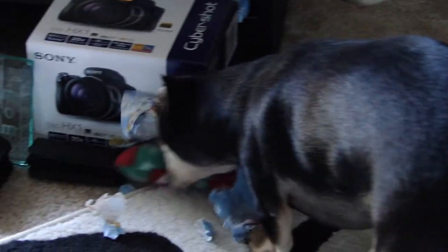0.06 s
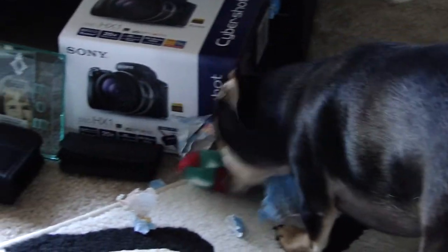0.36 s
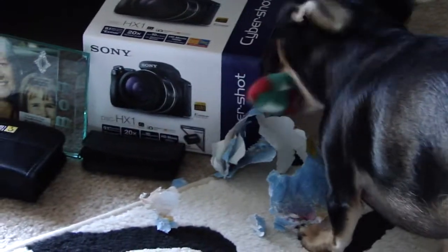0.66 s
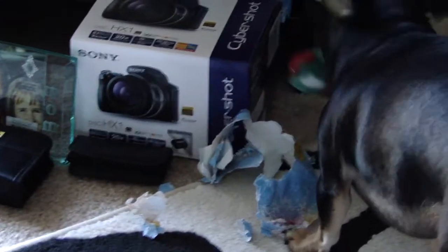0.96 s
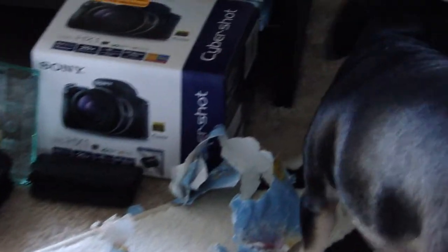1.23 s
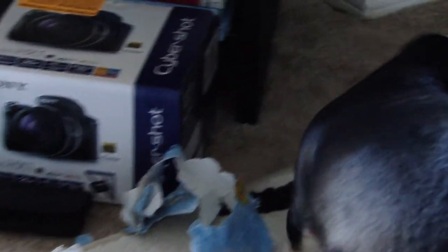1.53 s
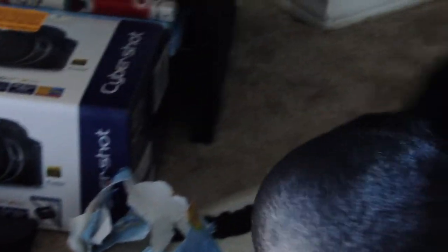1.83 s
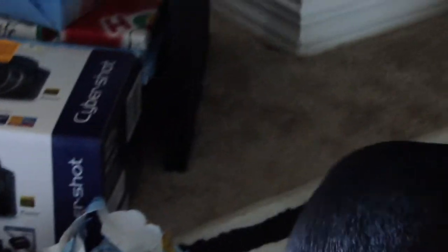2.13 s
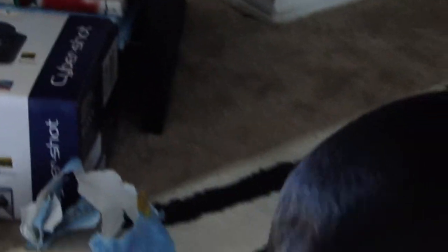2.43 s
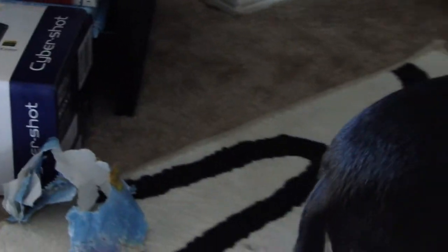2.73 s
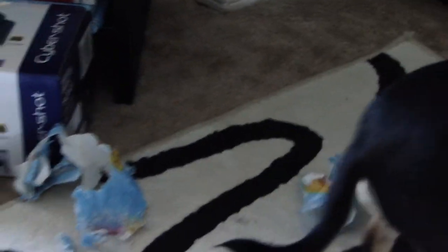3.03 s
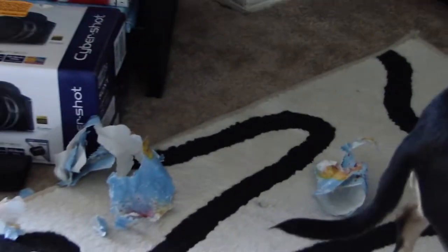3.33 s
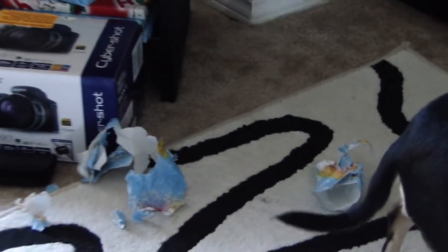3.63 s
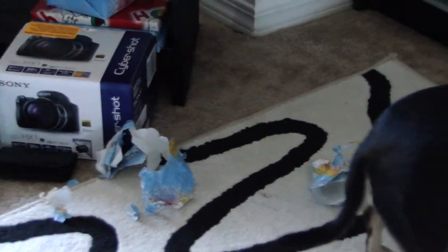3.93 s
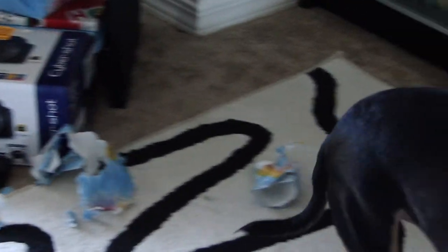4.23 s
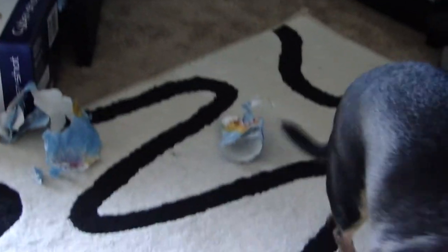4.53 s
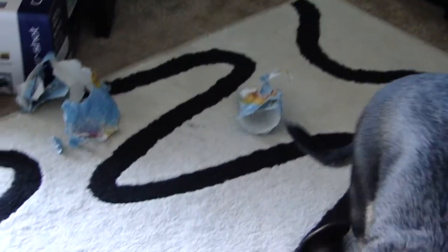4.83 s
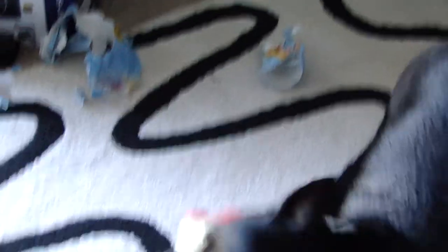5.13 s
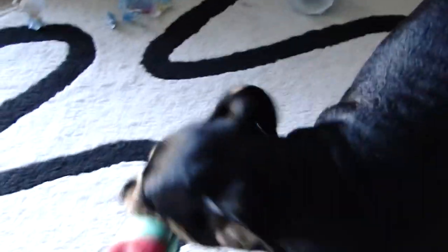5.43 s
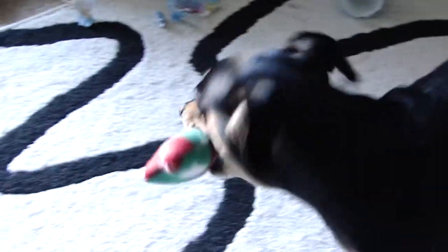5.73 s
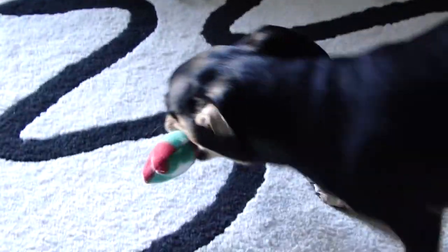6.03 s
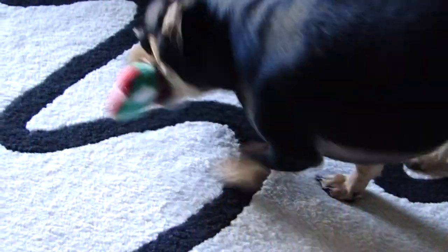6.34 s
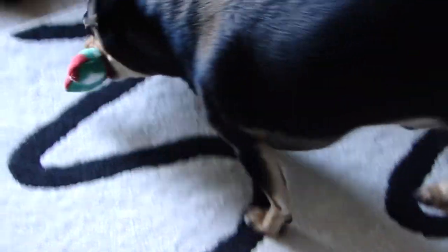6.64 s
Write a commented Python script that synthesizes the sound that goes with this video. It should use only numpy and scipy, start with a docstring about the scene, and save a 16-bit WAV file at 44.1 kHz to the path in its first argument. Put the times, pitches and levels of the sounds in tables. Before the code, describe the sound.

In a quiet room with a faint fan hum, a nearby dog bites a squeaky toy five times, making very short, high chirps spaced a second or so apart, the last the loudest. Early on, fur scrapes along cardboard; then come a click, a brief paper rustle and the thin whir of a camera zoom. Later the toy's bulb pops and puffs air. Soft footfalls, carpet rubs and small snaps run throughout.

```python
"""A dog with a squeaky toy

A small dog carries a plush toy over carpet and bites it five times. Each bite drives air past a reed,
which chirps; the plastic bulb pops as it buckles and springs back. Friction sounds as the dog brushes
a cardboard box and torn wrapping paper, amid soft footfalls and small snaps. Behind it a fan hums,
and a camera's zoom motor whirs twice, with a click of its lever before the second run."""
import sys
import numpy as np
from scipy import signal
from scipy.fft import rfft, irfft, next_fast_len
from scipy.io import wavfile
from scipy.ndimage import uniform_filter1d, map_coordinates

SR = 44100
rng = np.random.default_rng(int(sys.argv[2]) if len(sys.argv) > 2 else 0)


def generate_wav(signal):
    """Clip the signal to [-1, 1] and save it as 16-bit WAV at the path in sys.argv[1]."""
    frames = np.transpose(np.atleast_2d(signal))
    scaled = np.clip(frames, -1, 1) * 32767
    pcm = np.round(scaled).astype(np.int16)
    wavfile.write(sys.argv[1], SR, pcm)


N = 294588
T = np.arange(N) / SR
TOP_HZ = 12900  # upper band limit
FADE_DB = 10  # a stroke swells by this much over its rise and dies by as much over its fall

# Noise spectra of the sources. Each row: frequency in Hz, relative spectral density in dB.
AIR_SPECTRUM = [(25, -33), (53, -39), (97, -12), (152, -10.5), (219, -4), (308, -3), (351, -4.5),
                (481, 1.5), (563, -2.5), (1650, -8), (1980, -13), (3200, -15.7), (5000, -20.3),
                (10800, -26.3), (12050, -26.5), (13000, -92)]
GEAR_SPECTRUM = [(500, -11), (2000, 1), (4500, -2), (7400, -4), (8200, 4.5), (9000, -4.5), (11000, 2),
                 (13000, -13)]
PLUSH_SPECTRUM = [(50, -40), (200, -21), (500, 1), (1500, -2.5), (3500, -4), (6000, -11), (10000, -14.5),
                  (13000, -22)]
PAW_SPECTRUM = [(40, -43), (130, -8.5), (300, -5.5), (550, 5), (1000, 4.5), (2000, -15), (6000, -70)]
BOX_SPECTRUM = [(100, -40), (220, -16), (380, -4.5), (530, -3.5), (680, -10.5), (850, -1.5), (1050, -5.5),
                (1190, -12), (1500, -5.5), (1800, -12), (3300, -14), (4500, -18), (11000, -23.5),
                (13000, -32)]
WALL_SPECTRUM = [(900, -37), (1220, -10), (1340, 7), (1450, -1), (1600, 3), (1740, -16), (2400, -38)]
PAPER_SPECTRUM = [(100, -40), (200, -21.5), (500, -4.5), (900, -6.5), (1300, -7.5), (1900, -15.5),
                  (2600, -19), (3500, -13), (6000, -19.5), (10800, -25.5), (13000, -34)]
DRAFT_SPECTRUM = [(60, -48), (400, 0), (1200, -2.5), (2400, 0), (3700, 2), (5500, -3.5), (8000, -9.5),
                  (11000, -6.5), (13000, -22)]
# Stereo likeness of the noises. Each row: frequency in Hz, left-right correlation.
AIR_COHERENCE = [(60, -0.37), (150, -0.48), (300, -0.006), (1000, -0.41), (4000, -0.2), (10000, -0.32)]
RUB_COHERENCE = [(200, 0.3), (1000, 0.42), (4000, 0.1), (10000, 0.067)]
# The room's decay. Each row: frequency in Hz, reverberation time in seconds.
ROOM_T60 = [(200, 0.52), (1200, 0.41), (2400, 0.36), (4000, 0.35), (7000, 0.34), (12000, 0.27)]
# Resonant modes. Each row: frequency in Hz, bandwidth in Hz, relative gain in dB.
LEVER_MODES = [(1590, 190, 1), (3450, 210, 1), (3850, 220, -1.5), (4650, 300, -3.5), (5270, 400, -4),
               (6660, 900, -8.5), (11000, 2500, -20.5)]
CREASED_PAPER_MODES = [(1490, 150, 10.5)]
BOWED_PAPER_MODES = [(500, 400, -10), (1030, 61, 15), (2170, 130, 14.5), (2950, 90, 12.5)]
BULB_MODES = [(1730, 190, -2), (2475, 270, 4), (2880, 420, -2), (3880, 230, -5), (5850, 700, -16),
              (10100, 5900, -25.5)]
# The fan's hum. Each row: frequency in Hz, level in dB.
FAN_TONES = [(354, -62.5), (410, -67)]
# Runs of the lens motor. Each row: start in seconds, end in seconds, level in dB.
ZOOM_RUNS = [(1.425, 1.724, -57.5), (2.3, 3.883, -52)]
# Impacts. Each row: start in seconds, level in dB.
LEVER_BLOWS = [(2.275, -31), (2.278, -26.5), (2.2815, -30)]  # the zoom lever clicks home
PAW_STEPS = [(1.991, -38.5), (2.358, -46), (2.585, -38), (3.364, -43), (3.44, -48), (5.619, -43.5),
             (5.743, -37), (5.965, -39), (6.311, -49)]
BULB_POPS = [(4.5828, -34.5), (4.593, -47), (4.7143, -19), (4.717, -27), (4.7238, -24.5), (4.7271, -29),
             (5.9778, -21)]  # the bulb buckles and springs back
# Strokes of noise. Each row: peak time in seconds, relative level in dB, rise and fall in seconds.
RUSTLE_STROKES = [(.02, -47, .03, .12), (.27, -52, .14, .19), (.53, -55.5, .12, .19), (1.05, -45, .04, .04),
                  (2.0, -44.5, .06, .1), (2.36, -49.5, .025, .05), (3.29, -52, .17, .1),
                  (3.44, -46.5, .14, .27), (3.86, -56, .15, .03), (4.345, -46.5, .05, .06),
                  (4.61, -48.5, .045, .11), (4.82, -54.5, .15, .17), (5.24, -44, .035, .045),
                  (5.6, -43.5, .13, .17), (6.33, -47.5, .08, .11), (6.68, -46, .025, .05)]  # carpet rubs; the last row is a brief rise of noise at the very end
WALL_STROKES = [(1.11, -39, .04, .045), (1.25, -45, .04, .05)]  # fur catches and the box wall sings out
DRAFT_STROKES = [(.02, -48, .02, .06), (.415, -56, .06, .06), (4.17, -46, .11, .1), (4.245, -49, .04, .03),
                 (4.6, -52, .025, .06), (4.72, -50, .012, .08), (5.24, -48, .03, .04),
                 (5.42, -45.5, .018, .06), (5.81, -37.5, .048, .125), (5.98, -44.5, .1, .07)]
# The flank pressing along the box. Each row: time in seconds, relative level in dB.
BOX_PRESSURE = [(0.82, -65), (0.856, -49), (0.928, -57), (0.936, -49), (1.118, -40), (1.246, -39),
                (1.292, -46), (1.31, -43)]
# The note of the ribbed cardboard. Each row: time in seconds, pitch in Hz, level in dB.
RIB_NOTE = [(.99, 215.3, -56), (1.04, 250, -47), (1.10, 320, -49), (1.15, 380, -45.5), (1.20, 388, -42.5),
            (1.25, 345, -44.5), (1.30, 225, -55)]
# Small snaps and, last, one low thump of a paw.
# Each row: start in seconds, peak in dB, mode in Hz, its gain in dB.
SNAPS_AND_THUMP = [(.3352, -31, 2000, 16), (1.455, -36, 2470, 40), (1.4653, -34, 1300, 33),
                   (1.991, -33.5, 1600, 38), (2.017, -34.5, 1550, 36), (2.308, -40, 2300, 19),
                   (2.474, -32, 2300, 30), (2.516, -37, 1430, 16), (2.581, -38, 1100, 25),
                   (3.439, -40, 2600, 15), (3.714, -33, 1360, 27), (4.044, -34, 2350, 28),
                   (5.057, -43, 2300, 31), (5.746, -28.5, 380, 42)]
# The reed's harmonics. Each row: multiple of the pitch, relative level in dB.
REED_HARMONICS = [(1, 0.5), (2, -4), (3, -8), (4, -11), (5, -14), (6, -16), (7, -14.5), (8, -12.5),
                  (9, -16), (10, -21), (11, -33)]
# Bites. Each row: start and length in seconds, first pitch in Hz, level in dB, rasp from 0 to 1, tilt in
# dB per octave, resonance in Hz, reverberation relative to direct in dB, left minus right in dB.
TOY_BITES = [(1.3285, .018, 1216, -29, .6, 1.2, 11200, .8, 1.5),
             (2.9035, .015, 1212, -31.2, .4, 1.1, 3560, 2, -3.5),
             (3.930, .023, 1285, -23.8, .9, 1.5, 2750, 4.5, -5),
             (5.2703, .011, 1150, -29.6, .18, -.7, 9150, -3.5, 1.5),
             (5.8655, .059, 1298, -14.9, .05, .4, 9200, -3.2, 1)]


def amp(db):
    """Decibels to amplitude ratio."""
    return 10 ** (np.asarray(db) / 20)


def unit(x):
    """Normalisation to an rms of 1."""
    return x / np.sqrt(np.mean(x ** 2) + 1e-20)


def along(points, hz):
    """Interpolation of (Hz, value) points on a logarithmic frequency axis."""
    f, v = np.transpose(points)
    return np.interp(np.log(hz + 1), np.log(f + 1), v)


def level(rows):
    """Amplitude envelope through (seconds, dB) points, silent outside them."""
    s, db = np.transpose(rows)
    return uniform_filter1d(amp(np.interp(T, s, db, left=-120, right=-120)), size=256)


def strokes(rows):
    """Envelope of strokes that grow and decay exponentially; incoherent sounds add in power."""
    power = 0
    for s, db, rise, fall in rows:
        distance = np.maximum((s - T) / rise, (T - s) / fall)
        power += amp(db - FADE_DB * np.minimum(distance, 10)) ** 2
    return np.sqrt(power)


def wobble(rate, size=N):
    """Random modulation: a smooth curve with rate knots a second."""
    return map_coordinates(rng.standard_normal(int(size * rate / SR) + 4), [T[:size] * rate])


def filtered(x, response):
    """Linear filtering: the spectrum of x times a frequency response."""
    n = x.shape[-1]
    m = next_fast_len(n + 8192)
    return irfft(rfft(x, m) * response(np.fft.rfftfreq(m, 1 / SR)), m)[..., :n]


def low_cut(x, hz):
    """Second-order high-pass: 12 dB less per octave well below hz."""
    return filtered(x, lambda f: f ** 2 / np.sqrt(f ** 4 + hz ** 4))


def resonance(f, hz, width):
    """Response of a damped oscillator, 1 at its centre."""
    return 1j * f * width / (hz * hz - f * f + 1j * f * width)


def add(out, s, x):
    """Superposition of x on out from time s."""
    i = max(0, round(s * SR))
    out[..., i:i + x.shape[-1]] += x[..., :max(0, N - i)]


def rush(spectrum, coherence, grain_db=0, grain_rate=300):
    """Partly coherent stereo noise of rms 1, clumped into grains by amplitude modulation."""
    def mid_and_side(f):
        angle = np.arccos(np.clip(along(coherence, f), -1, 1)) / 2
        return amp(along(spectrum, f)) * np.array([np.cos(angle), np.sin(angle)])

    noise = rng.standard_normal((2, N)) * amp(grain_db * wobble(grain_rate))
    mid, side = filtered(noise, mid_and_side)
    return unit(np.array([mid + side, mid - side]))


def in_room(x, wet_db, pan_db=0, early_db=8, early_s=0.017, gap_s=0.0027, width=0.98):
    """Reverberation: direct sound, dense echoes from near furniture, then an exponential tail."""
    hz, t, noise = signal.stft(rng.standard_normal((2, SR // 2)), SR, nperseg=256)
    decay = amp(-60 * t / along(ROOM_T60, hz)[:, None])
    mid, side = signal.istft(noise * decay, SR, nperseg=256)[1]
    t = np.arange(len(mid)) / SR
    onset = amp(early_db * np.exp(-t / early_s)) * (1 - np.exp(-(t / gap_s) ** 2))
    tail = onset * np.array([mid + width * side, mid - width * side])
    out = signal.fftconvolve(x[None], tail, axes=1)
    out *= amp(wet_db) * np.sqrt(2 * np.sum(x ** 2) / np.sum(out ** 2))
    add(out, 0, x * amp([[pan_db / 2], [-pan_db / 2]]))
    return out


def knocks(blows, modes, room_db):
    """Impulse response: each blow rings a plastic part's damped modes, alternating in sign."""
    out = np.zeros((2, N))
    ring = filtered(signal.unit_impulse(SR // 20), lambda f: sum(
        (-1) ** k * amp(db) * resonance(f, hz, width) for k, (hz, width, db) in enumerate(modes)))
    for s, db in blows:
        add(out, s, in_room(amp(db) * ring / np.abs(ring).max(), room_db))
    return out


def fan_and_air(air_db=-49.5, drift_rad=0.86):
    """Broadband air noise lies under a fan's tones, which phase modulation makes slightly unsteady."""
    hum = 0
    for hz, db in FAN_TONES:
        drift = drift_rad * np.array([wobble(11), wobble(7)])
        hum += amp(db) * np.sqrt(2) * np.sin(2 * np.pi * hz * T + drift)
    return amp(air_db) * rush(AIR_SPECTRUM, AIR_COHERENCE) + hum


def zoom_motor():
    """Gear noise: tiny meshing teeth hiss while the lens travels."""
    running = sum(level([(start, db), (end, db)]) for start, end, db in ZOOM_RUNS)
    return running * rush(GEAR_SPECTRUM, AIR_COHERENCE, grain_db=1.5, grain_rate=180)


def rustles(gain_db=-1):
    """Stick-slip friction of paws and plush on carpet; the last stroke is just a brief rise of noise."""
    noise = rush(PLUSH_SPECTRUM, RUB_COHERENCE, grain_db=2.5, grain_rate=470)
    return amp(gain_db) * strokes(RUSTLE_STROKES) * noise


def footfalls(rise_s=0.0013, t60=0.16):
    """Cushioned impacts carry little treble: paws land on the carpet with dull puffs."""
    push, t = np.zeros(N), np.arange(SR // 3) / SR
    for s, db in PAW_STEPS:
        add(push, s, amp(db - 60 * t / t60) * (1 - np.exp(-t / rise_s)))
    return push * rush(PAW_SPECTRUM, RUB_COHERENCE)


def box_rub(hiss_db=0.5, wall_db=-11, unevenness=0.035, release_s=.13):
    """Friction of fur on cardboard hisses and rings the wall; the ribs' passing rate sets a note."""
    s, hz, db = np.transpose(RIB_NOTE)
    rib_hz = np.interp(T, s, hz) * (1 + unevenness * wobble(150))
    note = level(np.column_stack([s, db])) * np.sin(2 * np.pi * np.cumsum(rib_hz) / SR)
    note *= amp(2.6 * wobble(88.9))  # roughness
    end_s, end_db = BOX_PRESSURE[-1]
    pressure = level([*BOX_PRESSURE, (end_s + 2 * release_s, end_db - 2 * FADE_DB)])
    hiss = amp(hiss_db) * pressure * rush(BOX_SPECTRUM, RUB_COHERENCE, grain_db=1.0, grain_rate=270)
    wall_drive = np.hypot(amp(wall_db) * pressure, strokes(WALL_STROKES))
    wall = wall_drive * rush(WALL_SPECTRUM, RUB_COHERENCE, grain_db=0.5, grain_rate=170)
    return hiss + wall + in_room(note, wet_db=-2)[:, :N]


def paper_rub(push_s=2.474, bow_s=2.54, slip_s=2.582, slip_db=-30.5):
    """Stick-slip friction drives a sheet whose modes change as it bows; it peaks on slipping free."""
    attack_s, bowing_s = .004, 0.012
    build_db_per_s, die_db_per_s = 78, 230
    slips = rush(PAPER_SPECTRUM, RUB_COHERENCE, grain_db=1.5, grain_rate=300)

    def sheet(modes):
        return unit(filtered(slips, lambda f: 1 + sum(
            (amp(db) - 1) * resonance(f, hz, width) for hz, width, db in modes)))

    bowed = .5 + .5 * np.tanh((T - bow_s) / bowing_s)
    touching = .5 + .5 * np.tanh((T - push_s) / attack_s)
    below_peak_db = np.maximum(build_db_per_s * (slip_s - T), die_db_per_s * (T - slip_s))
    push = touching * amp(slip_db - below_peak_db)
    return push * ((1 - bowed) * sheet(CREASED_PAPER_MODES) + bowed * sheet(BOWED_PAPER_MODES))


def snaps_and_thump(t60=.013, width_hz=900, low_hz=700):
    """Transient excitation: a short burst rings one damped mode, as a small snap or a paw's low thump."""
    out, t = np.zeros((2, N)), np.arange(SR // 10) / SR
    band = lambda f: (1j * f / (low_hz + 1j * f)) ** 2 * (f < TOP_HZ)
    for s, db, hz, ring_db in SNAPS_AND_THUMP:
        burst = rng.standard_normal(len(t)) * amp(-60 * t / t60)
        hit = filtered(burst, lambda f: band(f) * (1 + amp(ring_db) * resonance(f, hz, width_hz)))
        add(out, s, in_room(amp(db) * hit / np.abs(hit).max(), wet_db=-3))
    return out


def reed_draft():
    """Below the threshold of oscillation, air only hisses through the reed on a squeeze or refill."""
    return strokes(DRAFT_STROKES) * rush(DRAFT_SPECTRUM, RUB_COHERENCE, grain_db=1.0)


def squeaker():
    """Self-sustained oscillation: a reed whistles, then beats on its seat, lower and rich in harmonics."""
    free_hz, rest_hz, sag_hz_per_s = 1600, 1172, 520
    overblown_hz, loss_db_per_hz = 1215, .16
    gentle_onset_s, halving_loss_db, release_s = .004, 2.5, .0047
    settle_s, settle_power = .0135, 1.7
    jitter, flutter_db, hiss_db, rasp_hiss_db = .04, 2.5, -26, 20
    whistle_db, whistle_s = -6, .0045
    band_db, smear_rad, lag_s_per_db, lead_s = 5.5, 0.14, .000012, .02
    out = np.zeros((2, N))
    t = np.arange(SR // 6) / SR - lead_s
    k = np.arange(1, len(REED_HARMONICS) + 1)[:, None]
    harmonic_db = np.array(REED_HARMONICS)[:, 1:]
    spent = 1 - np.exp(-(np.maximum(t, 0) / settle_s) ** settle_power)  # the bulb's pressure settles
    for s, length, first_hz, db, rasp, tilt_db, band_hz, room_db, pan_db in TOY_BITES:
        # a hard bite starts higher and more suddenly, and loses more pressure
        loss_db = loss_db_per_hz * max(first_hz - overblown_hz, 0)
        onset_s = gentle_onset_s / (1 + loss_db / halving_loss_db)
        beating = .5 + .5 * np.tanh(1.52 * t / onset_s + 0.795)
        sag_hz = max(first_hz - rest_hz, 0) * spent + sag_hz_per_s * t  # the air runs out
        pitch = first_hz - sag_hz + (free_hz - first_hz) * (1 - beating)
        hz = k * pitch * (1 + jitter * rasp * wobble(867, size=len(t)))
        flow = np.exp(np.minimum(t, 0) / onset_s - np.maximum(t - length, 0) / release_s)
        flow *= amp(db - loss_db * spent + flutter_db * wobble(402, size=len(t)))
        # a resonance lifts one band of each squeak
        lift_db = band_db * np.abs(resonance(hz, band_hz, band_hz / 4))
        colour_db = harmonic_db + tilt_db * np.log2(k) + lift_db
        # dispersion: the tube and stuffing delay the high harmonics, spreading each pulse
        phase = 2 * np.pi * np.cumsum(hz, axis=1) / SR - smear_rad * (k - 1) ** 2
        tone = -np.sum(amp(colour_db) * beating ** (k - 1) * np.cos(phase), axis=0)
        # air leaks past the reed once a cycle
        puffs = rng.standard_normal(len(t)) * (1 + np.cos(phase[0]))
        hiss = unit(filtered(puffs, lambda f: amp(along(DRAFT_SPECTRUM, f))))
        leak = amp(hiss_db + rasp_hiss_db * rasp) * beating * hiss
        # a gentle bite lets the free reed whistle more strongly
        whistle_gain = amp(db + whistle_db) * onset_s / gentle_onset_s
        whistle = whistle_gain * np.exp(-np.abs(t) / whistle_s) * np.sin(2 * np.pi * free_hz * t)
        chirp = low_cut(flow * (tone + leak) + whistle, hz=850)  # a small source radiates little bass
        heard = in_room(chirp, room_db, pan_db)
        # the louder channel receives the chirp first
        ahead_s = lag_s_per_db * pan_db * np.array([[1], [-1]])
        add(out, s - lead_s, filtered(heard, lambda f: np.exp(1j * np.pi * f * ahead_s)))
    return out


def scene():
    """Superposition of the toy, the dog and the camera over the quiet room."""
    toy = reed_draft() + squeaker() + knocks(BULB_POPS, BULB_MODES, room_db=1)
    movement = box_rub() + paper_rub() + rustles() + footfalls() + snaps_and_thump()
    camera = zoom_motor() + knocks(LEVER_BLOWS, LEVER_MODES, room_db=-4.5)
    return toy + movement + camera + fan_and_air()


def record(dry):
    """Band limiting: the microphone drops the deep bass, and the treble ends steeply at TOP_HZ."""
    return filtered(low_cut(dry, hz=45), lambda f: 1 / np.sqrt(1 + (f / TOP_HZ) ** 120))


dry = scene()
out = record(dry)
generate_wav(out)
```